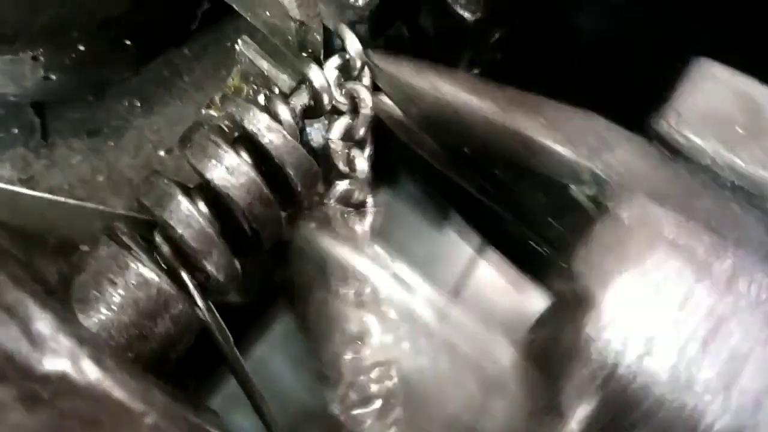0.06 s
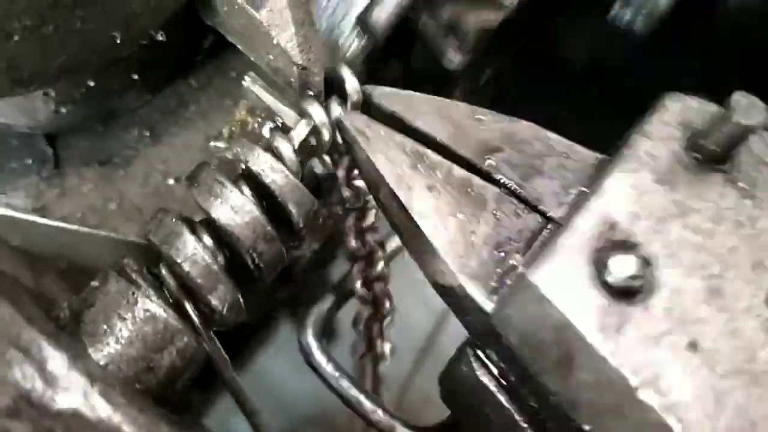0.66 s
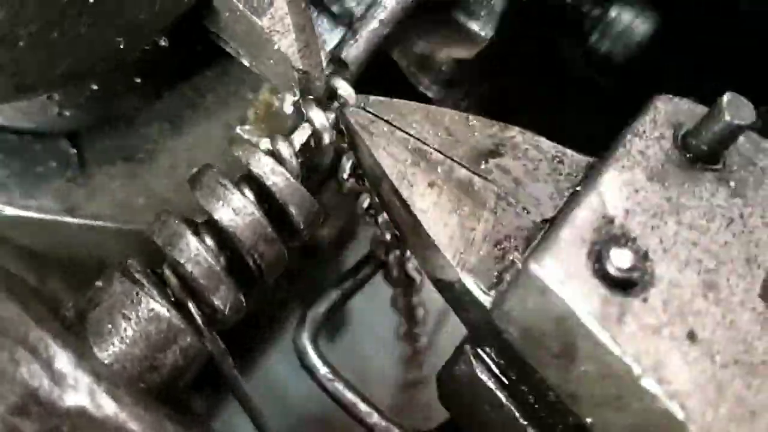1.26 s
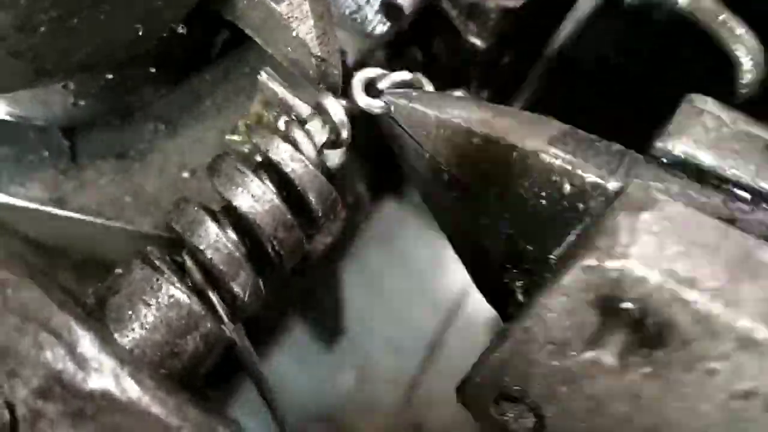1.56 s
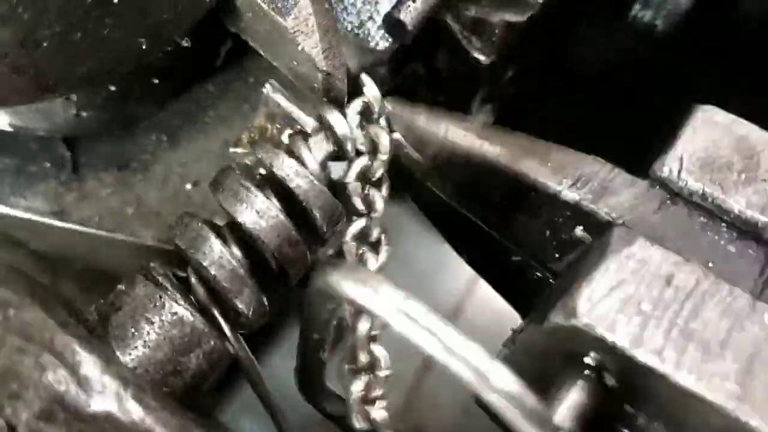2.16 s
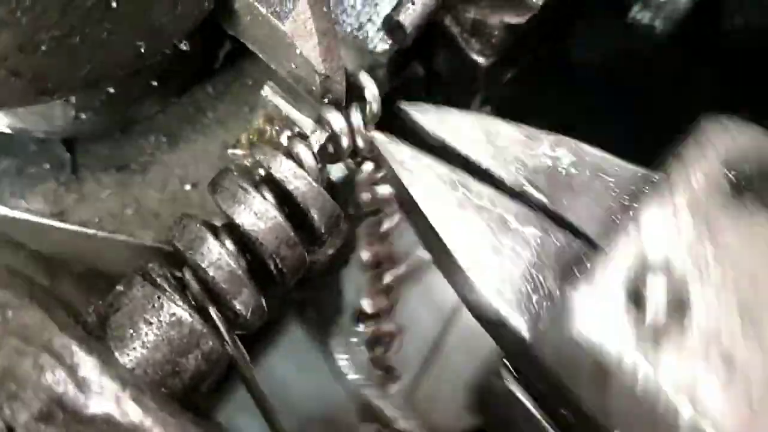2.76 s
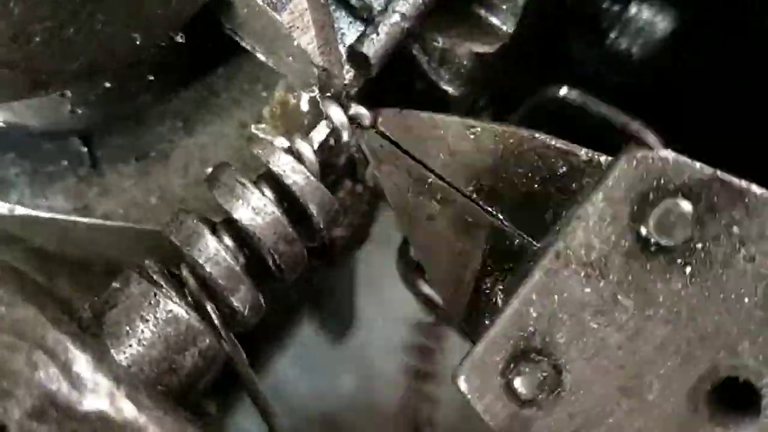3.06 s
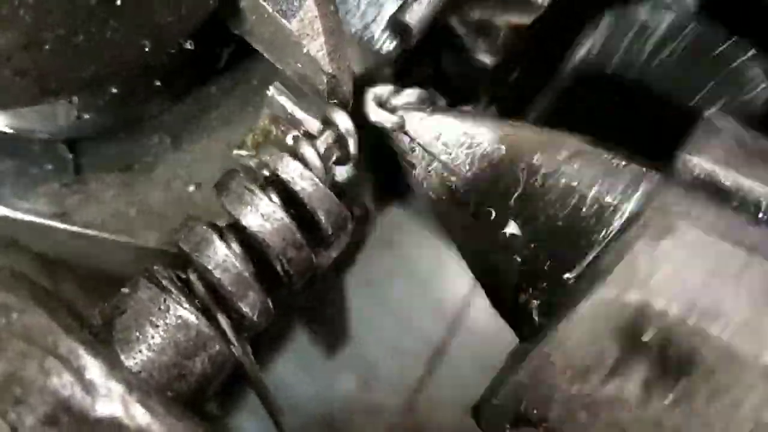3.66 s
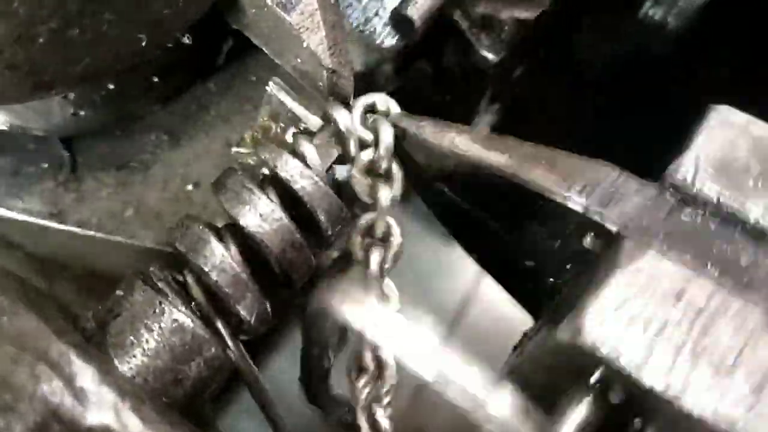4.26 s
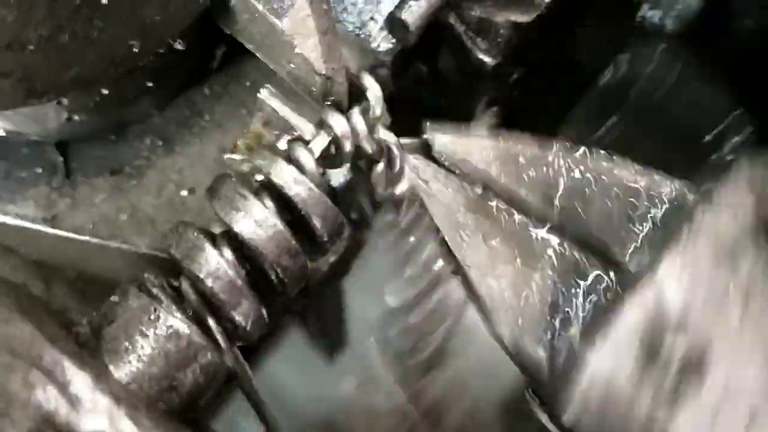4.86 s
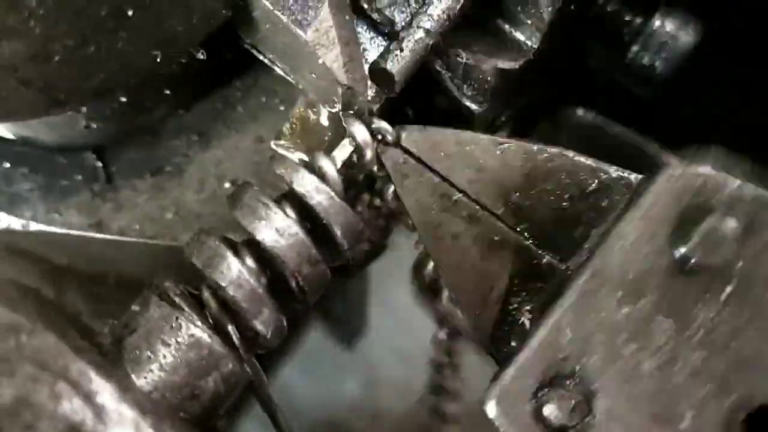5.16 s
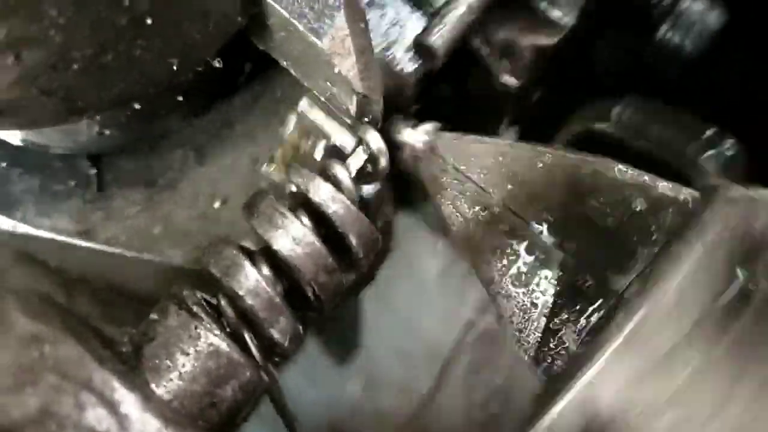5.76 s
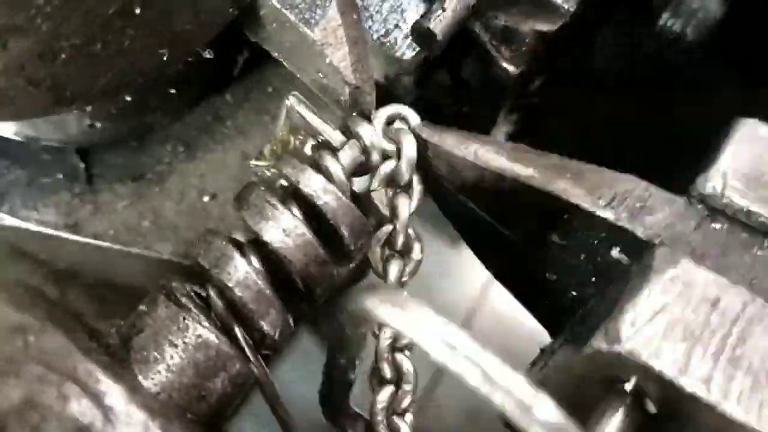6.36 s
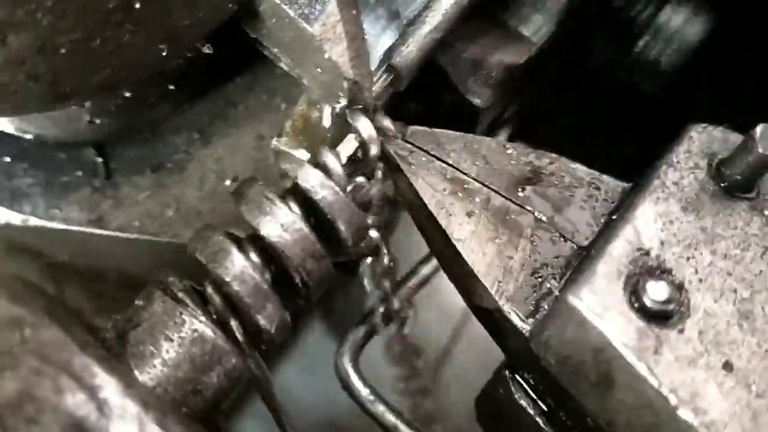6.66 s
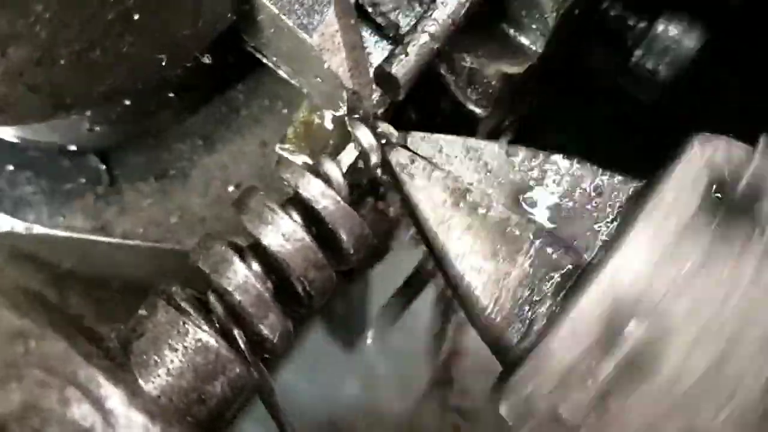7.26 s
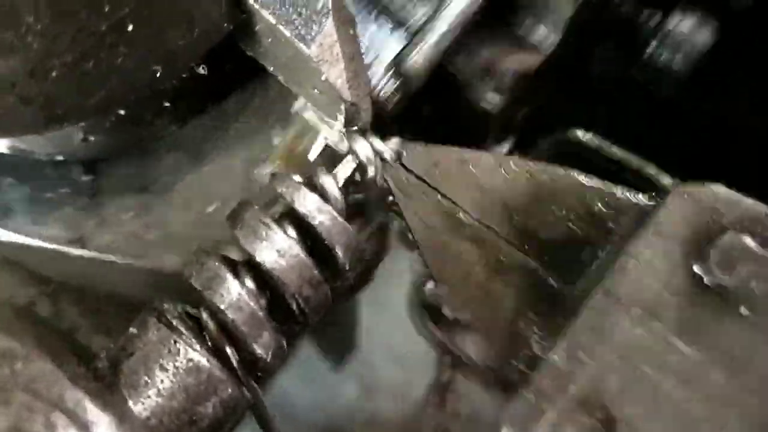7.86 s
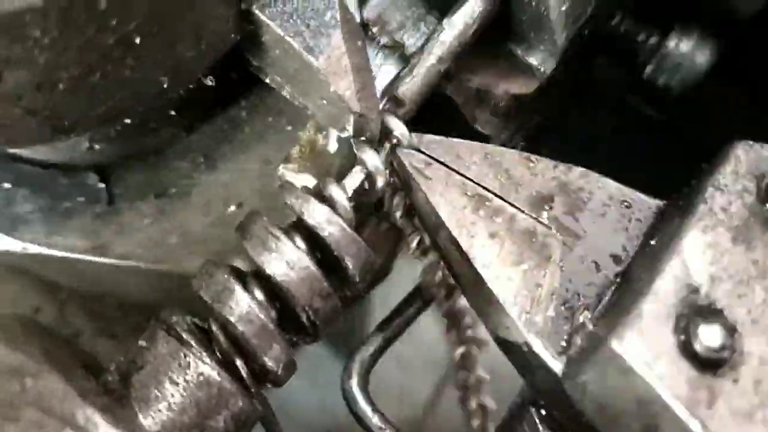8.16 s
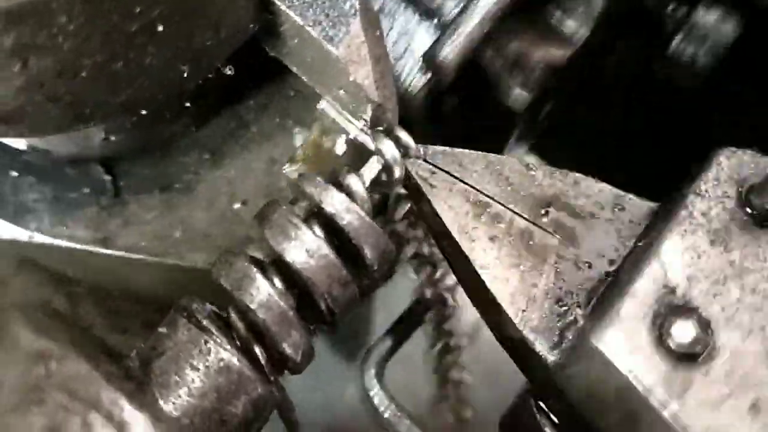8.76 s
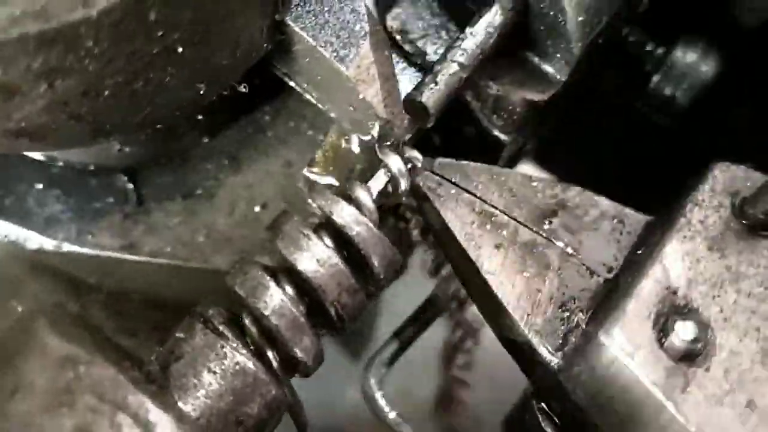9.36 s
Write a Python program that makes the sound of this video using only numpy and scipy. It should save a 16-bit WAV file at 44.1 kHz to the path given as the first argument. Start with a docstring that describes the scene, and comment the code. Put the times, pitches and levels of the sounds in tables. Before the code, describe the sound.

An automatic chain-making machine is already running at 0 seconds and keeps the same pace to the end, a little past 9 seconds. It is very close, in a workshop with short, dull reflections. Cutter, wire feed, bender and pliers make quick, rough bursts of steel-on-steel chatter, forming a link about every half second. The whole pattern repeats every 1.06 seconds. In each cycle the pliers swing over with a strong clash, near 0.1, 1.2, 2.2 seconds and so on, and return with another about a third of a second later, with light clinks of dragged chain. The steel bed rings briefly after the strokes. Cams knock the heavy frame into short low booms, and a soft low drone swells late in each cycle. Underneath, a wavering motor hum with gear noise dips briefly once per cycle, near 0.6, 1.6, 2.7 seconds and onward.

```python
"""Short bursts of steel-on-steel chatter, close to the microphone: a chain machine in a workshop.
It makes two links on each turn of its camshaft, each by the same strokes of cutter, pawl, bender and
pliers; once a turn the pliers swing over and back, dragging the chain. The steel bed rings with the
strokes, the cams knock the cast frame into low booms, and the motor hums underneath."""
import sys
import numpy as np
from scipy import signal
from scipy.fft import rfft, irfft, next_fast_len
from scipy.io import wavfile
from scipy.ndimage import map_coordinates

SR = 44100
rng = np.random.default_rng(int(sys.argv[2]) if len(sys.argv) > 2 else 0)


def waveform_to_disk(signal):
    """Save audio, clipped to [-1, 1], as 16-bit WAV at the path in sys.argv[1]."""
    frames = np.transpose(np.atleast_2d(signal))
    scaled = np.clip(frames, -1, 1) * 32767
    samples = np.round(scaled).astype(np.int16)
    wavfile.write(sys.argv[1], SR, samples)


N = 414981
TIME = np.arange(N) / SR
TURN_S, FIRST_TURN_S = 1.0608, -0.443   # the camshaft runs steadily and is already in mid-turn
TURN_STARTS = np.arange(FIRST_TURN_S, N / SR, TURN_S)
CUTOFF_HZ = 11445


def from_db(db):
    """Decibels to gain."""
    return 10 ** (np.asarray(db) / 20)


def rms_one(x):
    """Scale to unit rms."""
    return x / np.sqrt(np.mean(x ** 2) + 1e-20)


def gain_at(points, hz):
    """Gain of a (Hz, dB) spectrum, joined on a log-frequency axis."""
    knots, db = np.transpose(points)
    return from_db(np.interp(np.log(hz + 1), np.log(knots), db))


def resonance(hz, centre, width):
    """Response of one damped mode, 1 at its centre."""
    return 1 / (1 + 2j * (hz - centre) / width)


def drift(rate, size=N):
    """A smooth random curve with a spread near 1, changing about rate times a second."""
    steps = np.arange(0, size + 32, 32)
    slow = map_coordinates(rng.standard_normal(1024), [steps / SR * rate + 8], order=3, mode="wrap")
    return np.interp(np.arange(size), steps, slow)


def swell(t, rise, fade):
    """An envelope that builds up to 1 at t = 0 and lets go again."""
    span_s = np.maximum(np.where(t < 0, rise, fade), 1e-3)
    return np.exp(-2 * np.abs(t / span_s) ** 1.8)


def add(track, sound, start):
    """Mix a sound in at a time in seconds."""
    at = int(round(start * SR))
    first, last = max(at, 0), min(at + len(sound), N)
    if last > first:
        track[first:last] += sound[first - at:last - at]


def workshop(x, t60, first_echo_s, size=32768):
    """Dense, dull reflections reach the microphone from the walls and the machine's own body."""
    # The colour of the room. Each row: frequency in Hz, level in dB.
    room_tone = [(100, -12.5), (600, -7), (1500, -18), (4500, -20), (9000, -26)]
    t = np.arange(size) / SR
    echoes = rng.standard_normal(size) * from_db(-60 * t / t60) * (t > first_echo_s)
    colour = gain_at(room_tone, np.fft.rfftfreq(size, 1 / SR))
    echoes = irfft(rfft(echoes / np.linalg.norm(echoes)) * colour)
    return signal.fftconvolve(x, echoes)[:N]


def motor(waver, waver_hz):
    """Hum tones close in pitch beat and waver, over the steady noise of the gears."""
    # The hum of motor and drive. Each row: frequency in Hz, level in dB.
    hum_tones = [(93.5, -47), (100.5, -46.5), (107.5, -45), (199, -49.5)]
    # The running noise of motor and gears. Each row: frequency in Hz, level in dB.
    gear_spectrum = [(40, -13.5), (70, -28.5), (100, -23), (140, -17), (200, -20.5), (400, -35.5),
                     (600, -25), (1000, -36.5), (1600, -37.5), (3500, -45), (6000, -42.5), (10000, -48)]
    hum = 0
    for hz, db in hum_tones:
        wobble = 1 + waver * (drift(waver_hz) + 1j * drift(waver_hz))
        hum = hum + from_db(db) * rms_one((wobble * np.exp(2j * np.pi * hz * TIME)).real)
    size = next_fast_len(N)
    colour = gain_at(gear_spectrum, np.fft.rfftfreq(size, 1 / SR))
    gears = irfft(rfft(rng.standard_normal(size)) * colour, size)[:N]
    return hum + gears


def load_gain(off_at_s, dip_db, ease_s, return_s):
    """The load comes off the drive at the end of each turn, and the motor's level dips."""
    t = (TIME - FIRST_TURN_S - off_at_s + TURN_S / 2) % TURN_S - TURN_S / 2
    return from_db(-dip_db * swell(t, ease_s, return_s))


def boom(t, rise, fade, hz, rough, wander_hz, sharp=0.069):
    """A frame mode swells and dies: sharp while the cam presses on it, shaken in strength and phase."""
    shake = drift(wander_hz, size=len(t)) + 1j * drift(wander_hz, size=len(t))
    pitch = hz * (1 + sharp * (t < 0) * (1 - swell(t, rise, fade)) * np.exp(-np.abs(t) / 0.031))
    tone = np.exp(2j * np.pi * (np.cumsum(pitch) / SR + rng.random())) * (1 + rough * shake)
    return swell(t, rise, fade) * rms_one(tone.real)


def frame_drone(at_s, level_db, swing_db, period_s, strongest_s, size=32768):
    """Late in each turn the frame drones under load, waxing and waning from turn to turn."""
    out, t = np.zeros(N), (np.arange(size) - size // 2) / SR
    for start in TURN_STARTS:
        db = level_db + swing_db * np.cos(2 * np.pi * (start - strongest_s) / period_s)
        tone = boom(t, rise=0.24, fade=0.26, hz=198, rough=0.35, wander_hz=30, sharp=0.01)
        add(out, from_db(db) * tone, start + at_s + t[0])
    return out


def cam_knocks(uneven_db, pivot_hz, shake_per_cycle, size=12288):
    """Cam knocks ring all the frame's modes: the loud knocks near 600 Hz, the two soft ones low."""
    # The knocks of one turn. Each row: seconds into the turn, level in dB, bass weight in dB per
    # octave below pivot_hz, ring length as a factor.
    knocks = [(0.048, -28.5, 3.5, 0.54), (0.088, -38.5, 8.5, 0.74), (0.34, -23, -7, 1),
              (0.395, -24, -4.5, 1.57), (0.537, -18, -5, 0.68), (0.589, -19, -3, 0.73),
              (0.624, -22.5, -9, 1.63), (0.875, -16.5, -14.5, 0.82), (0.904, -18, -9, 0.46),
              (0.966, -24, -2.5, 0.95)]
    # The frame's modes, the low ones slower to build. Each row: frequency in Hz, seconds from knock
    # to peak, swell and fade in seconds at ring length 1, relative level in dB.
    frame_modes = [(198.2, 0.04, 0.034, 0.03, -0.9), (213.7, 0.01795, 0.015, 0.022, -4),
                   (270.3, 0.01383, 0.015, 0.034, -7), (329, 0.01297, 0.015, 0.053, -5.5),
                   (568, 0.00094, 0.01, 0.019, -2.5), (606, 0.00198, 0.0083, 0.034, -1.5)]
    out, t = np.zeros(N), (np.arange(size) - size // 3) / SR
    for at, knock_db, weight_db, length in knocks:
        for hz, lag, rise, fade, mode_db in frame_modes:
            db = knock_db + mode_db + weight_db * np.log2(pivot_hz / hz)
            for start in TURN_STARTS:
                knock = boom(t, rise * length, fade * length, hz, 0.6, wander_hz=shake_per_cycle * hz)
                gain = from_db(db + uneven_db * rng.standard_normal())
                add(out, knock * gain, start + at + lag + t[0])
    return out


def overtones(hz, low_hz, count, width):
    """The many fine modes of a steel piece, from about low_hz up; rms 1 below the cutoff."""
    centres = np.linspace(low_hz, CUTOFF_HZ, count) + rng.normal(0, 63.0, count)
    phases = np.exp(2j * np.pi * rng.random(count))
    modes = sum(phase * resonance(hz, centre, width) for phase, centre in zip(phases, centres))
    return modes / np.sqrt(np.mean(np.abs(modes[hz < CUTOFF_HZ]) ** 2))


def steel_bed(clatter, fine_db, size=16384):
    """The steel bed rings on after the strokes, in a few main modes and many fine ones."""
    # The bed's main modes. Each row: frequency in Hz, width in Hz, gain in dB.
    bed_modes = [(1172, 52, -1), (2098, 41, -4), (2453, 39, 1), (2960, 15, -12.5), (3317, 48, 5),
                 (3600, 11, 3), (4900, 28, -37), (5900, 94, -10)]
    hz = np.fft.rfftfreq(size, 1 / SR)
    main = sum(from_db(db) * resonance(hz, centre, width) for centre, width, db in bed_modes)
    fine = from_db(fine_db) * overtones(hz, low_hz=897.0, count=40, width=71) / np.hypot(1, hz / 4500)
    return signal.fftconvolve(clatter, irfft(main + fine))[:N]


def turn_strokes(second_cut_late_s=0.005):
    """All strokes of one turn: a link in each half, and one swing of the pliers."""
    # The strokes that make a link. Each row: part, peak in seconds into the half turn, swell and fade
    # in seconds, relative force in dB, treble tilt in dB per octave.
    link_strokes = [("cutter", 0.049, 0.015, 0.023, -8, 0), ("levers", 0.112, 0.022, 0.028, -14.5, -10),
                    ("feed pawl", 0.155, 0.014, 0.012, -18, 0), ("levers", 0.217, 0.009, 0.016, -19, 2.5),
                    ("link bender", 0.24, 0.01, 0.016, -10, 0.36), ("levers", 0.271, 0.016, 0.027, -18, 0),
                    ("cam follower", 0.339, 0.011, 0.023, -13, 0),
                    ("plier grip", 0.4312, 0.012, 0.025, -10, 0), ("levers", 0.465, 0.067, 0.075, -17, -6)]
    # The pliers swing over and back and drag the chain. Rows as above, timed within the whole turn.
    swing_strokes = [("levers", 0.002, 0.023, 0.019, -21, 1.5),
                     ("wire and chain", 0.366, 0.0065, 0.014, -17, -0.5),
                     ("cam follower", 0.392, 0.014, 0.017, -13.5, 0),
                     ("wire and chain", 0.402, 0.027, 0.024, -13.5, -0.7),
                     ("plier turn", 0.538, 0.018, 0.016, -2.14, 0),
                     ("wire and chain", 0.618, 0.012, 0.015, -17.5, 2.3),
                     ("plier return", 0.896, 0.012, 0.015, -5, 0),
                     ("levers", 0.928, 0.054, 0.035, -14.5, -11),
                     ("wire and chain", 1.003, 0.015, 0.031, -22.5, -1)]
    second_link = [(part, at + TURN_S / 2 + second_cut_late_s * (part == "cutter"), *rest)
                   for part, at, *rest in link_strokes]
    return link_strokes + second_link + swing_strokes


def chatter(per_s, spread_db, size):
    """Rough steel faces meet in a hail of tiny impacts of uneven size."""
    hits = rng.random(size) < per_s / SR
    signs = rng.choice([-1, 1], size)
    strengths = from_db(spread_db * np.clip(rng.standard_normal(size), -2, 2))
    return rms_one(hits * signs * strengths)


def tools(uneven_db, play_s, clink_hz, baffle_hz, tilt_from_hz, size=8192):
    """Each stroke is a burst of chatter that follows the contact pressure, coloured by its part."""
    # How the parts make contact. Each entry: tiny impacts per second, strength of the fine ringing.
    contact = { "cutter": (13000, 0.65), "feed pawl": (8000, 0.16), "link bender": (10000, 0.34),
               "plier grip": (12000, 1), "plier turn": (9000, 0.77), "plier return": (5400, 0.93),
               "wire and chain": (1300, 1.9), "cam follower": (4000, 1), "levers": (1500, 1.63), }
    # The resonances of each part. Each row: frequency in Hz, width in Hz, lift in dB.
    part_modes = { "cutter": [(809, 13, 11), (1073, 50, 11.5), (1242, 100, 11), (1640, 15, 4),
                  (2015, 79, 17.5), (2300, 53, 7), (2480, 48, 6), (2943, 13, 15.5), (3190, 120, 6.5),
                  (3620, 130, 9.5), (4500, 160, 11), (5900, 1570, 12)], "feed pawl": [(2004, 17, 10.5),
                  (3080, 106, 19.5), (3740, 35, 12), (3910, 30, 11), (4190, 77, 13.5), (4720, 81, 13),
                  (6170, 110, 10), (7870, 670, 16)], "link bender": [(1056, 8.6, 11.5), (2000, 24, 10),
                  (2620, 150, 5.5), (3123, 100, 16), (3100, 48, 3), (4294, 81, 16), (5110, 194, 17.5),
                  (5850, 180, -10), (5800, 200, 13), (7390, 500, 20.5), (9230, 190, 18)],
                  "plier grip": [(765, 45, 9.5), (1135, 53, 12), (1623, 26, 13.5), (1820, 120, 8),
                  (2314, 68, 5.5), (2473, 88, 11.5), (2996, 59, 14.5), (3318, 19, 1), (3750, 18.5, 12.5),
                  (4300, 15, -8), (5800, 180, 1.5)], "plier turn": [(1170, 118, 17.5), (1330, 65, 6),
                  (1625, 32, 16.5), (1950, 270, 11), (1920, 140, 4.5), (2465, 79, 16), (2936, 30, 7),
                  (3150, 120, 11.5), (3270, 25, 2), (5000, 273, 9), (8140, 690, 13)],
                  "plier return": [(1310, 35, 21.5), (1610, 28, 2), (1886, 18, 21.5), (2196, 88, 13.5),
                  (2820, 470, 15.5), (6620, 570, 20), (8890, 380, 22.5)], "wire and chain": [(1119, 98, 20),
                  (1757, 20, 19.5), (2026, 124, 13.5), (2530, 180, 15), (3320, 430, 10), (6380, 180, 14),
                  (8130, 1000, 14), (8850, 207, 22)], "cam follower": [(1173, 61, 2.5), (2070, 105, 9.5),
                  (2520, 170, 11)], "levers": [(1050, 67, 11.5), (1886, 75, 8.5), (2540, 150, 6),
                  (3260, 220, 8), (3730, 85, 6.5), (4930, 88, 8.5), (5430, 246, 15.5), (6080, 150, 9.5),
                  (7140, 1200, 9)], }
    # The frequencies in Hz at which the parts' broad tone is set.
    tone_hz = [250, 600, 1500, 4500, 9000]
    # The broad tone of the parts. Each entry: a relative level in dB at each of tone_hz.
    tone_db = { "cutter": (-2, 0, -12.5, -13.5, -6), "feed pawl": (-12, 3, -5, -12, -17.5),
               "link bender": (-0.5, 0, -11.5, -13, -19.5), "plier grip": (0, -2.5, -19, 1, -0.5),
               "plier turn": (-10.5, -0.5, -26.5, -12.5, -19.5), "plier return": (5.5, -7, -33, -18, -25.5),
               "wire and chain": (1, -6, -27, -10, -24.5), "cam follower": (-10, -1, -8.5, -27, -40),
               "levers": (-16.5, -1.5, -15.5, -15.5, -20), }
    out, hz = np.zeros(N), np.fft.rfftfreq(size, 1 / SR)
    t = (np.arange(size) - size // 3) / SR
    radiated = hz ** 3 / np.hypot(hz ** 3, baffle_hz ** 3)   # small parts radiate hardly any bass
    treble_octaves = np.log2(np.hypot(1, hz / tilt_from_hz))
    for part, at, rise, fade, force_db, tilt_db in turn_strokes():
        per_s, ringing = contact[part]
        body = np.prod([1 + (from_db(db) - 1) * resonance(hz, centre, width)
                        for centre, width, db in part_modes[part]], axis=0)
        # a stroke lands on the same spot on every turn, so it keeps its own clink
        clink = 1 + ringing * overtones(hz, clink_hz, count=36, width=172)
        clink /= np.hypot(1, ringing * (hz > clink_hz))
        tone = gain_at(list(zip(tone_hz, tone_db[part])), hz)
        colour = radiated * body * clink * tone * from_db(tilt_db * treble_octaves)
        pressure = from_db(force_db) * swell(t, rise, fade)
        for start in TURN_STARTS:
            strength, late = rng.standard_normal(2)   # play in the joints: no two strokes are alike
            burst = chatter(per_s, spread_db=1.37, size=size) * pressure * from_db(uneven_db * strength)
            add(out, irfft(rfft(burst) * colour), start + at + play_s * late + t[0])
    return out


def scene():
    """One microphone close to the machine, with a little of the workshop behind it."""
    clatter = tools(uneven_db=0.5, play_s=0.0006, clink_hz=2282, baffle_hz=145, tilt_from_hz=3400)
    clatter *= from_db(-1.17)
    ring = steel_bed(clatter, fine_db=-2.5)
    booms = cam_knocks(uneven_db=0.17, pivot_hz=600, shake_per_cycle=0.1596)
    drone = frame_drone(at_s=0.77, level_db=-38, swing_db=5.5, period_s=2.38, strongest_s=1.78)
    machine = clatter + ring + booms + drone
    room = workshop(machine, t60=0.25, first_echo_s=0.00626)
    load = load_gain(off_at_s=1.019, dip_db=12, ease_s=0.048, return_s=0.068)
    return (machine + room + load * motor(waver=1.0, waver_hz=7))[None]


def record(dry):
    """The microphone's bass and treble roll off, the tallest peaks are rounded, and the top is cut."""
    thin = signal.sosfilt(signal.butter(4, 85, "high", fs=SR, output="sos"), dry)
    soft = signal.sosfilt(signal.butter(10, 9900, fs=SR, output="sos"), thin)
    rounded = 0.68 * np.cbrt(np.tanh((soft / 0.68) ** 3))
    return signal.sosfilt(signal.cheby2(18, 60, CUTOFF_HZ, fs=SR, output="sos"), rounded)


dry = scene()
out = record(dry)
waveform_to_disk(out)
```